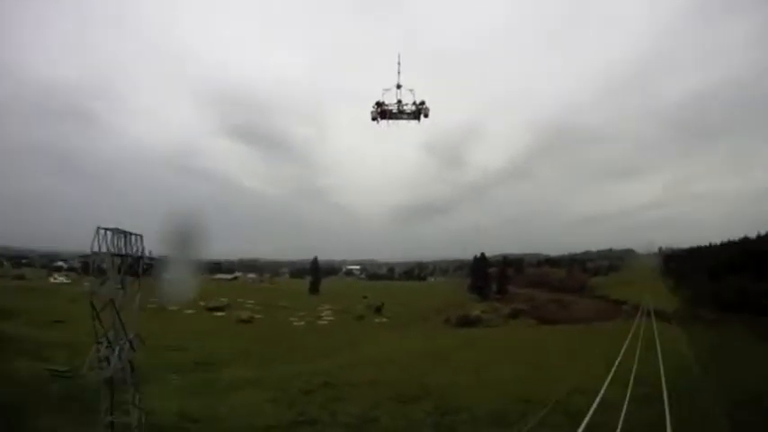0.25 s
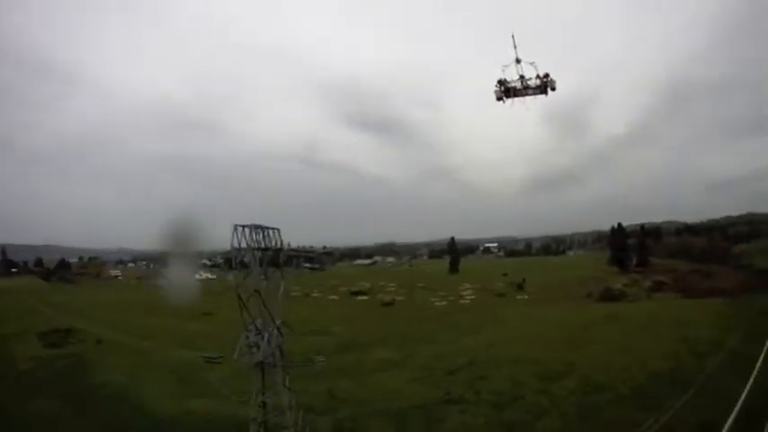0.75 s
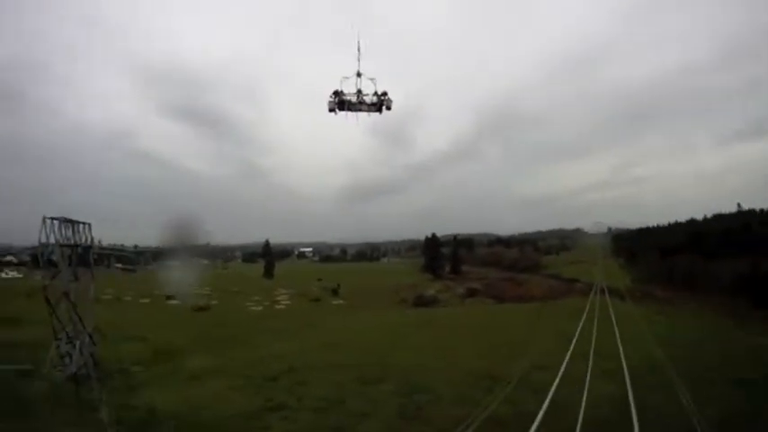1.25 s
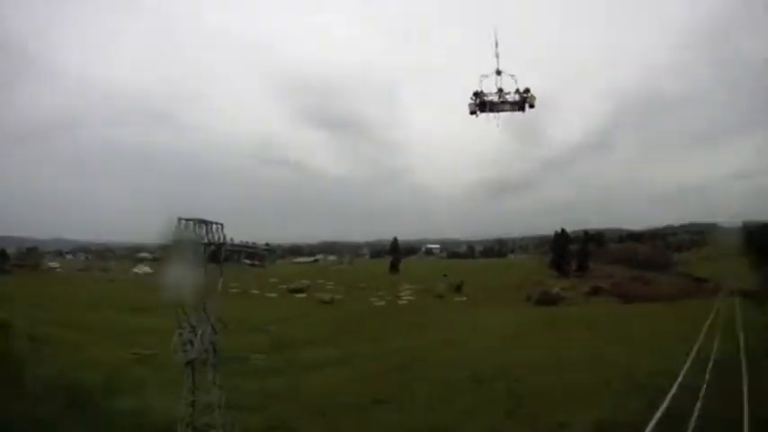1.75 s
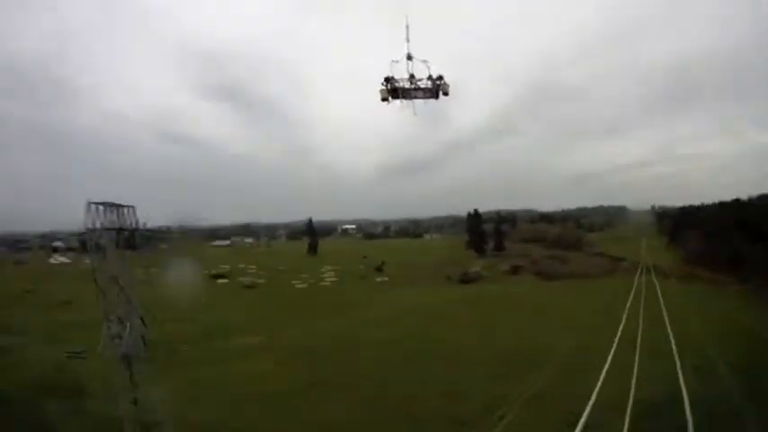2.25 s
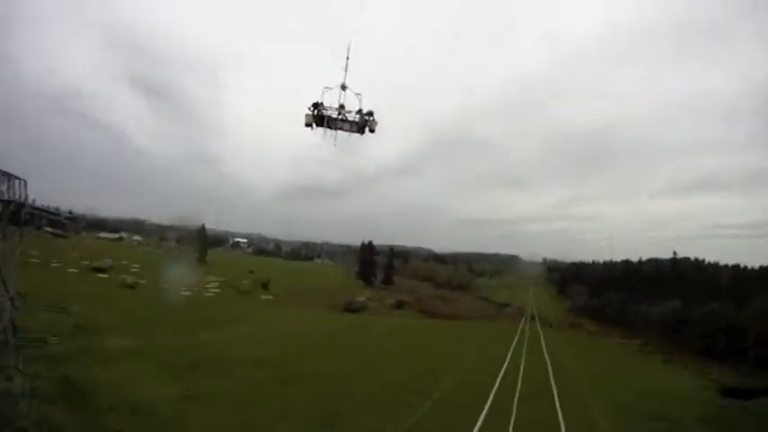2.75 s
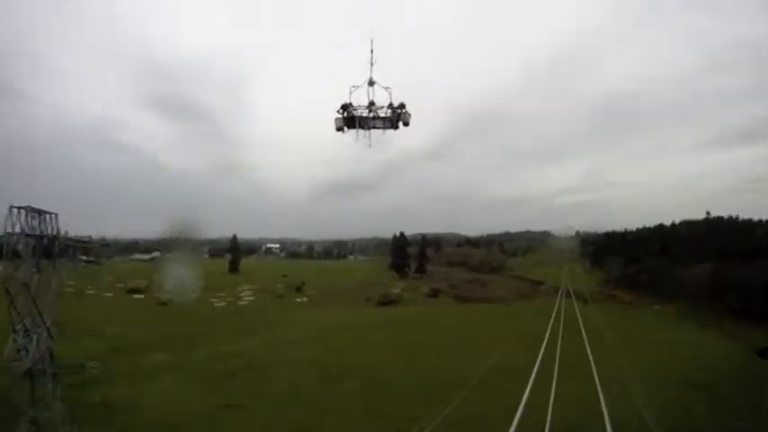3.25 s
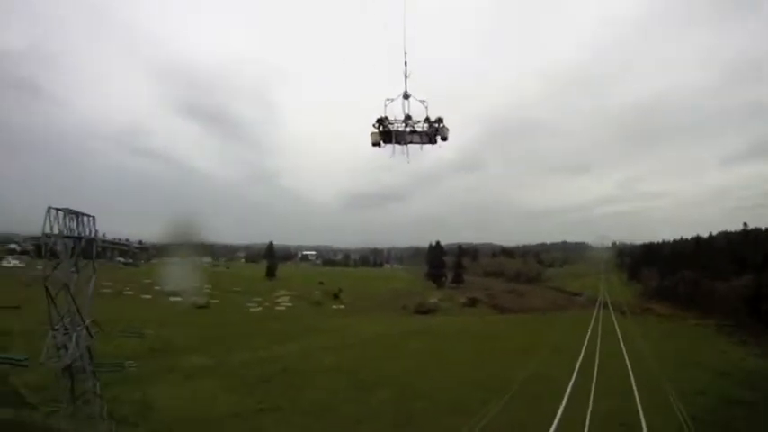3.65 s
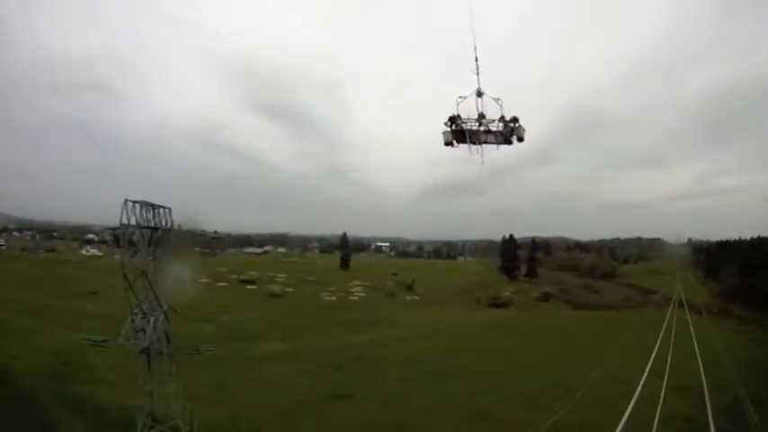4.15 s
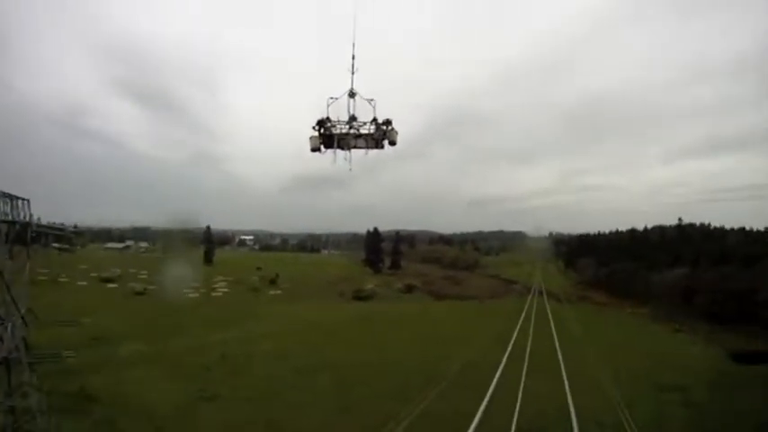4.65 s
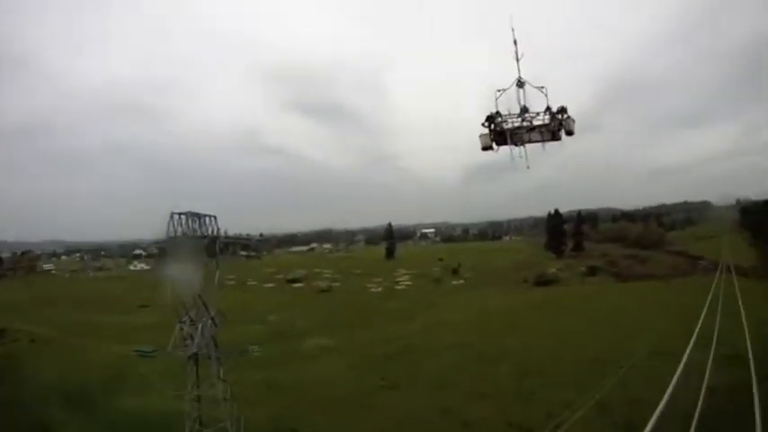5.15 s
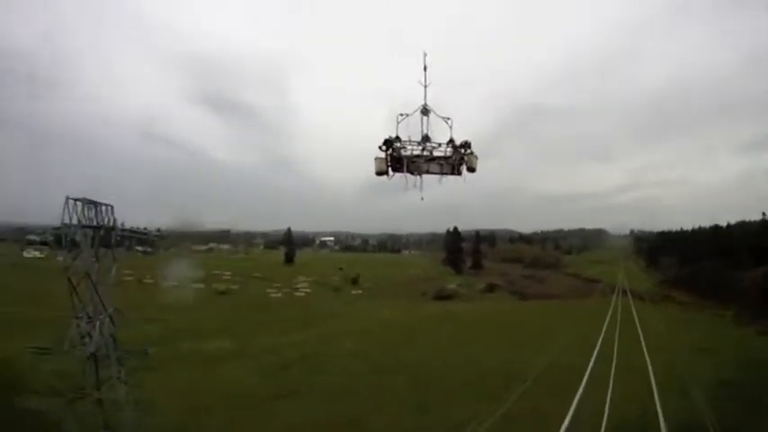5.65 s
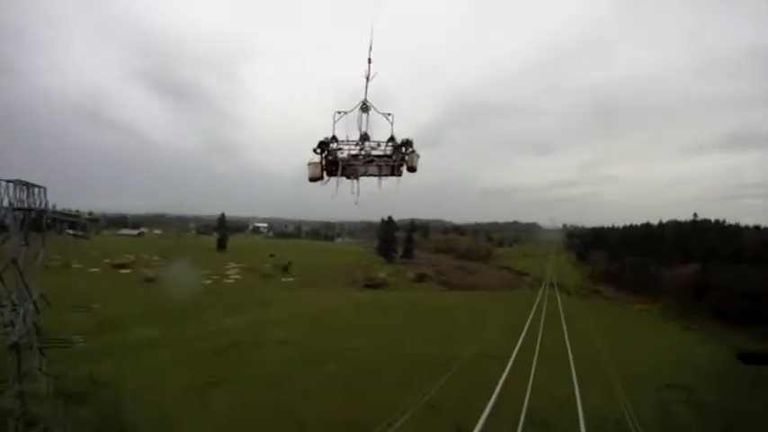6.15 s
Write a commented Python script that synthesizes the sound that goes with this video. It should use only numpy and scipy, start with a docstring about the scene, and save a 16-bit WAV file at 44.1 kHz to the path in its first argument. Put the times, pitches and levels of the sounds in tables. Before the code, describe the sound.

Rapid helicopter blade slaps swell, fade and crack above open fields, with fluttering rotor hum, windy wash and thin turbine hiss.

```python
"""A fast blade chop, sharpening and softening, stands over the hum of two rotors and the rush of the downwash.
It is a light helicopter with a slung load, heard from a camera on a power-line tower above open fields.
The chop, cracks, wash and turbine are shaped noise, ringing at the fixed pitches of the camera's case;
the rotors' hum is a set of fluttering harmonics, and low filtered noise rumbles beneath.
The camera's coarse sampling mirrors it all into a gritty treble."""
import sys
import numpy as np
from scipy import signal
from scipy.fft import rfft, irfft, next_fast_len
from scipy.io import wavfile
from scipy.ndimage import uniform_filter1d, minimum_filter1d, map_coordinates

SR = 44100
rng = np.random.default_rng(int(sys.argv[2]) if len(sys.argv) > 2 else 0)


def log_audio(samples):
    """Write samples as a 16-bit WAV file to the path given in sys.argv[1]."""
    # one column per channel
    frames = np.atleast_2d(samples).T
    # limit to full scale, then quantise
    limited = np.clip(frames, -1, 1)
    pcm = np.round(limited * 32767).astype(np.int16)
    wavfile.write(sys.argv[1], SR, pcm)


N = 281795
TIME = np.arange(N) / SR  # seconds

BLADE_HZ = 40.85  # main blades passing per second

# relative spectrum of the air noise at the main blades: frequency_hz, level_db
BLADE_AIR = [(100, -44.5), (400, -24), (700, -23), (900, -27), (1020, -6), (1500, -9), (2000, -2.5),
             (2600, -11.5), (3400, -15.5), (4200, -37), (5700, -41)]


def amp(db):
    """Decibels to gain."""
    return 10 ** (np.asarray(db) / 20)


def unit(x):
    """Scale x to an rms of 1."""
    return x / np.sqrt(np.mean(x ** 2) + 1e-20)


def along(points, hz):
    """Read a (frequency, value) table on a logarithmic frequency axis."""
    f, v = np.transpose(points)
    return np.interp(np.log(hz + 1), np.log(f + 1), v)


def curve(rows):
    """Draw straight lines through a (time, value) table, one value per sample."""
    time_s, value = np.transpose(rows)
    return np.interp(TIME, time_s, value)


def wobble(rate):
    """A smooth random curve with rate knots a second."""
    knots = rng.standard_normal(int(N * rate / SR) + 4)
    return map_coordinates(knots, [TIME * rate])


def filtered(x, response):
    """Multiply the spectrum of x by a response of frequency, without shifting its phase."""
    size = next_fast_len(N + SR // 4)
    hz = np.fft.rfftfreq(size, 1 / SR)
    return irfft(rfft(x, size) * response(hz), size)[:N]


def tilted(x, tilt_db):
    """Lean the spectrum about 1700 Hz, roughly tilt_db per octave and flat beyond one octave either side."""
    lean = filtered(x, lambda hz: np.clip(np.log2((hz + 1) / 1700), -1, 1))
    return x + np.log(amp(tilt_db)) * lean


def through_case(x, spectrum, size=8192):
    """Colour x with a spectrum and the case's resonances, which ring after each push; white noise keeps its power."""
    # resonances and hollows of the camera's case: centre_hz, width_hz, peak_db
    case_modes = [(892, 51, -9), (1200, 35, -3.5), (1282.4, 70, 8.5), (1683, 25, 7), (1870, 59, 5),
                  (2038, 20, -22), (2356, 35, -12.5), (2459, 100, 5.5), (2953, 320, -14), (3113, 280, 5.5),
                  (3682, 74, 6.5), (4720, 240, 11)]
    hz = np.fft.rfftfreq(size, 1 / SR)
    db = along(spectrum, hz)
    for centre, width, peak in case_modes:
        db = db + peak / (1 + (2 * (hz - centre) / width) ** 2)
    # fold the cepstrum to minimum phase, so that the ringing only follows the push
    cepstrum = irfft(np.log(amp(db)))
    cepstrum[1:size // 2] *= 2
    cepstrum[size // 2 + 1:] = 0
    ring = irfft(np.exp(rfft(cepstrum)))
    return signal.fftconvolve(x, ring / np.linalg.norm(ring))[:N]


def bursts(times, sizes, rise, fall, roundness):
    """A power envelope: each burst swells to its size at its time, then dies; roundness 1 is a cusp, 2 a bell."""
    t = np.arange(-(SR // 20), SR // 20 + 1) / SR
    shape = np.exp(-np.maximum(-t / rise, t / fall) ** roundness)
    places = np.clip(np.round(times * SR).astype(int), 0, N)
    hits = np.bincount(places, sizes, N + 1)[:N]
    return np.abs(signal.fftconvolve(hits, shape, "same"))


def blade_beat(rise, fall, scatter_db, jitter_s):
    """Power of the slaps, mean 1: each blade cuts the vortex of the one before it a little differently."""
    # the slaps drift late, then early: time_s, delay_ms
    lag = [(0.0, 9.2), (0.4, 12), (0.85, 10.5), (1.85, 20.6), (2.2, 23.6), (2.6, 22.1), (4.1, 33.9),
           (4.6, 15.4), (5.3, 10.8), (6.39, 19.6)]
    time_s, delay_ms = np.transpose(lag)
    times = np.arange(int(N / SR * BLADE_HZ) + 1) / BLADE_HZ
    times = times + np.interp(times, time_s, delay_ms) / 1000
    jitter = jitter_s * rng.standard_normal(len(times))
    sizes = amp(scatter_db * rng.standard_normal(len(times))) ** 2
    power = bursts(times + jitter, sizes, rise, fall, roundness=1.67)
    return power / power.mean()


def bunched(beat, share):
    """Gain that puts a share of the power into the blade beat and leaves the rest steady."""
    return np.sqrt(1 - share + share * beat)


def turbulence(repeat, gusty_db):
    """Lumpy noise of rms 1; each blade meets some of the same eddies as the one before it."""
    period = round(SR / BLADE_HZ)
    passes = rng.standard_normal((N // period + 1, period))
    # every row is one blade's pass and inherits part of the row before
    eddies = signal.lfilter([1], [1, -repeat], passes, axis=0).ravel()[:N]
    return unit(amp(gusty_db * wobble(500)) * eddies)


def blades(beat, effort_db):
    """Turbulence at the blade tips, partly steady and partly bunched into slaps."""
    # how closely the blades meet their own wake: time_s, share of the power in slaps (0-1, held to 0.97 below)
    slap_share = [(0.0, 0.76), (0.27, 0.6), (0.6, 0.88), (0.9, 0.63), (1.06, 0.72), (1.92, .3),
                  (2.12, 0.78), (2.65, .74), (3.18, .25), (3.6, 0.66), (4.3, .08), (4.65, .74),
                  (4.95, 0.72), (5.2, 0.99), (5.5, 0.48), (5.75, 0.76), (6.39, 0.1)]
    # the noise brightens and dulls as the rotor leans: time_s, tilt_db_per_octave
    rotor_lean = [(0.0, 1), (0.7, -0.5), (1.8, 1), (2.1, -0.5), (2.68, -2), (2.9, 2.5), (3.32, -2),
                  (3.55, 0.7), (4.45, -1), (6.0, 2)]
    share = np.clip(curve(slap_share), 0, .97)
    tilt_db = curve(rotor_lean) + 1.2 * wobble(9)  # with quick chance changes of tilt
    swell = amp(effort_db) * bunched(beat, share)
    air = through_case(swell * turbulence(repeat=0.26, gusty_db=0.9), BLADE_AIR)
    return tilted(air, tilt_db)


def with_reflection(x, gain, delay_s, sway):
    """A close reflection whose path sways with the camera, so that the colour keeps shifting."""
    delay = delay_s * np.exp(sway * wobble(7))
    echo = map_coordinates(x, [(TIME - delay) * SR], order=3)
    return (x + gain * echo) / np.sqrt(1 + gain ** 2)


def wash(beat, throb):
    """The rush of the downwash: noise that gusts and throbs lightly with the blades."""
    # the downwash at the camera: time_s, level_db
    downwash = [(0.0, -30.5), (1.2, -31), (1.7, -32.5), (2.28, -30.5), (2.5, -35.5), (3.2, -32.5),
                (3.6, -29.5), (4.2, -35), (4.7, -30.5), (4.95, -34.5), (5.65, -29.5), (6.39, -36.5)]
    # its relative spectrum: frequency_hz, level_db
    wash_air = [(60, -31), (250, -7.5), (385, -13), (440, -2.5), (520, 3.5), (700, -6), (900, -3),
                (2000, -14), (4000, -21.5), (5700, -37.5)]
    level_db = curve(downwash) + 0.97 * wobble(8)  # with quick gusts
    rush = bunched(beat, throb) * rng.standard_normal(N)
    return amp(level_db) * through_case(rush, wash_air)


def turbine():
    """The thin hiss of the turbine, shaped noise drifting on the wind."""
    # level of the hiss: time_s, level_db
    hiss = [(0.0, -40), (0.8, -37), (1.75, -33.5), (2.05, -42), (2.7, -40), (3.45, -36), (4.3, -34),
            (4.6, -43), (5.3, -41), (5.65, -35.5), (6.39, -37)]
    # its relative spectrum: frequency_hz, level_db
    turbine_air = [(500, -17.5), (2500, 9.5), (4200, -12), (4700, -19), (5300, -2.5), (5900, 0.5)]
    return amp(curve(hiss)) * through_case(rng.standard_normal(N), turbine_air)


def hum(hz, orders, drift, flutter, flutter_rate):
    """Harmonics of a rotor at rms 1; gusts shift their common phase, and moving air makes each one flutter."""
    turns = hz * TIME + drift * wobble(2.5)  # drift in blade passes
    tone = 0
    for order, db in orders:
        steady = np.exp(2j * np.pi * rng.random())
        path = steady + flutter * (wobble(flutter_rate) + 1j * wobble(flutter_rate))
        tone = tone + amp(db) * np.real(path * np.exp(2j * np.pi * order * turns))
    return unit(tone)


def main_rotor(main_db):
    """The low hum of the main rotor, at multiples of its blade passing rate."""
    # harmonics, relative to each other: multiple, level_db
    main_orders = [(1, -22), (2, -6.5), (3, -3), (4, 1), (5, -5), (6, -8), (7, -7), (8, -8), (9, -19),
                   (10, -7.5), (11, -6.5), (12, -20), (13, -6)]
    return amp(main_db) * hum(BLADE_HZ, main_orders, drift=0.045, flutter=0.38, flutter_rate=7)


def tail_rotor():
    """The higher hum of the tail rotor, with blades passing 97 times a second."""
    # harmonics, relative to each other: multiple, level_db
    tail_orders = [(1, -1), (2, 0), (3, -6), (4, -15.5)]
    level_db = -40.5 + 0.7 * wobble(3.44)  # drifts slowly
    return amp(level_db) * hum(97.0, tail_orders, drift=0.073, flutter=0.23, flutter_rate=6.5)


def rumble(main_db):
    """Low buffeting of the air, filtered noise that swells a little with the main rotor's hum."""
    # relative spectrum of the buffeting: frequency_hz, level_db
    buffeting = [(4, -25), (12, 3), (25, -12), (48, 0.5), (70, -8), (110, -3.5), (150, 4), (180, 0),
                 (228, -16), (330, -2), (385, -8.5), (500, -31)]
    noise = filtered(rng.standard_normal(N), lambda hz: amp(along(buffeting, hz)))
    follow_db = 0.1 * (main_db - main_db.mean())
    level_db = -40.0 + follow_db + 0.97 * wobble(5.05)
    return amp(level_db) * unit(noise)


def cracks():
    """Now and then a blade hits a vortex squarely: a short noise burst, dull or bright."""
    # the hardest blade slaps: peak_s, level_db, tilt_db_per_octave
    hard_slaps = [(0.531, -12, 9), (0.602, -8, -3), (0.7, -9, 2), (0.746, -7, -5), (1.143, -13, 6),
                  (1.188, -12, -4), (1.584, -10, -3), (2.153, -11, -3), (2.253, -12, -3), (2.572, -9, 4),
                  (2.648, -9, -3), (2.671, -3, -2), (2.846, -8, 3), (2.913, -12, 12), (3.312, -11, 3),
                  (3.603, -14, 1), (4.696, -12, -1), (4.943, -8, -4), (5.13, -6, -4), (5.178, -4.5, -9),
                  (5.202, 0, 1), (5.327, -5.5, 1.5), (5.375, -12, 2), (5.57, -11, 11), (5.694, -11, 1),
                  (6.264, -13.5, -4)]
    times, level_db, tilt_db = np.transpose(hard_slaps)
    power = bursts(times, amp(level_db) ** 2, rise=0.0013, fall=0.0013, roundness=1.9)  # seconds
    crack = through_case(np.sqrt(power) * rng.standard_normal(N), BLADE_AIR)
    return tilted(crack, np.interp(TIME, times, tilt_db))


def scene():
    """Chop, wash, turbine, the two rotors' hum, rumble and cracks, added together in open air."""
    # how hard the blades bite the air as the pilot holds the load: time_s, level_db of the blades' noise
    effort = [(0.0, -20.3), (0.28, -21), (0.66, -14), (1.0, -17), (1.2, -16), (1.46, -20.5), (1.62, -17),
              (2.07, -21.8), (2.55, -18.5), (2.92, -16.5), (3.1, -18.5), (3.4, -16), (3.68, -17.5),
              (4.05, -23), (4.5, -22.4), (4.74, -13), (5.0, -16.5), (5.7, -16), (6.05, -22), (6.39, -25)]
    # the main rotor's hum waxes and wanes: time_s, level_db
    main_hum = [(0.0, -36.5), (0.45, -33), (0.75, -37), (1.12, -32), (1.58, -38), (1.78, -33), (2.15, -41),
                (2.97, -35), (3.25, -36.5), (3.55, -32), (3.78, -38.5), (4.2, -34.5), (4.45, -38),
                (4.95, -40), (5.68, -31.5), (5.97, -40), (6.3, -34)]
    main_db = curve(main_hum)
    beat = blade_beat(rise=0.0024, fall=0.006, scatter_db=0.86, jitter_s=0.00029)
    chop = with_reflection(blades(beat, curve(effort)), gain=0.25, delay_s=0.001206, sway=0.349)
    air = wash(beat, throb=0.43) + turbine()
    rotors = main_rotor(main_db) + tail_rotor()
    return (chop + air + rotors + rumble(main_db) + cracks())[None]


def limited(x, ceiling, release_s=0.034, size=128):
    """The gain ducks at any peak over the ceiling and then recovers."""
    needed = minimum_filter1d(np.minimum(1, ceiling / (np.abs(x) + 1e-9)), size)
    # the deepest duck so far, fading exponentially with the release time
    age = TIME / release_s
    duck = np.exp(np.maximum.accumulate(np.log(1 - needed + 1e-9) + age) - age)
    return x * uniform_filter1d(1 - duck, size // 2)


def record(dry):
    """The camera limits peaks and holds each sample of a low rate, which mirrors the sound on both sides of that rate."""
    hold_hz, top_hz = 12000, 15400  # the low sample rate, and where the treble ends
    # a steep low-pass just under half the low rate
    band = filtered(dry[0], lambda hz: 1 / np.sqrt(1 + (2 * hz / hold_hz * 1.03) ** 120))
    band = limited(band, ceiling=.92)
    # a carrier at the low rate makes the mirror images, 0.45 dB above the band itself
    mirrored = band * (1 + 2 * amp(0.45) * np.cos(2 * np.pi * hold_hz * TIME))
    # holding each sample dulls the treble by a sinc curve
    return filtered(mirrored, lambda hz: np.sinc(hz / hold_hz) * (hz < top_hz))[None]


dry = scene()
out = record(dry)
log_audio(out)
```